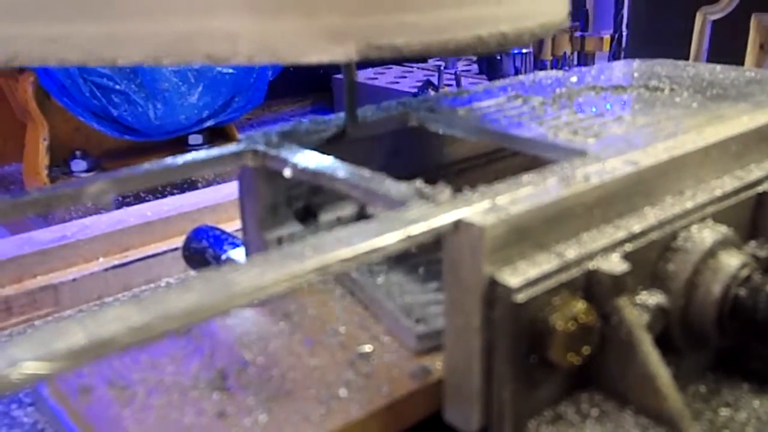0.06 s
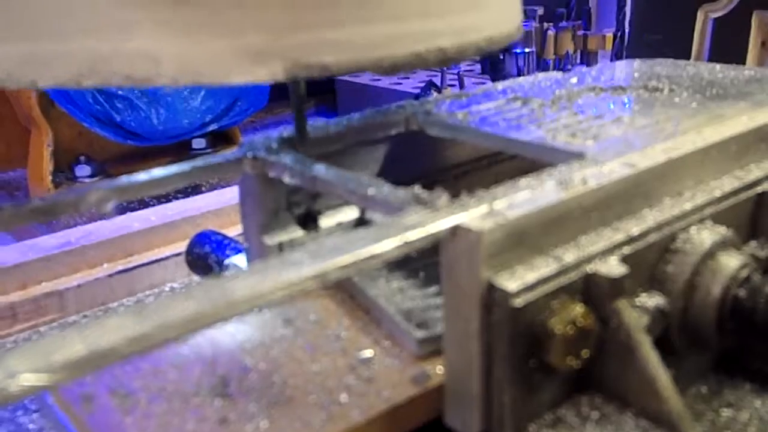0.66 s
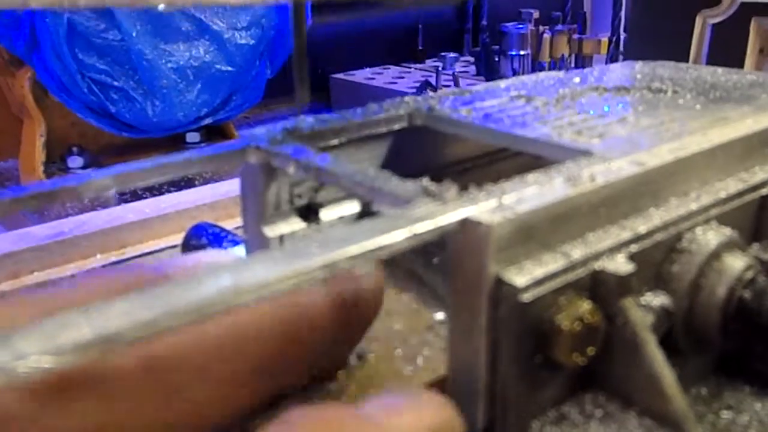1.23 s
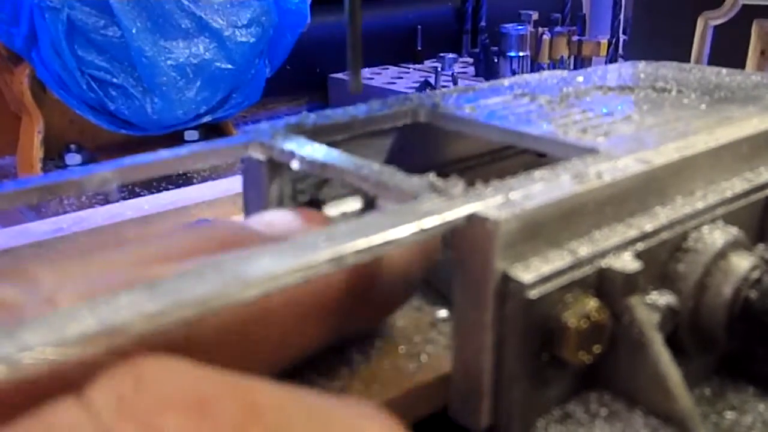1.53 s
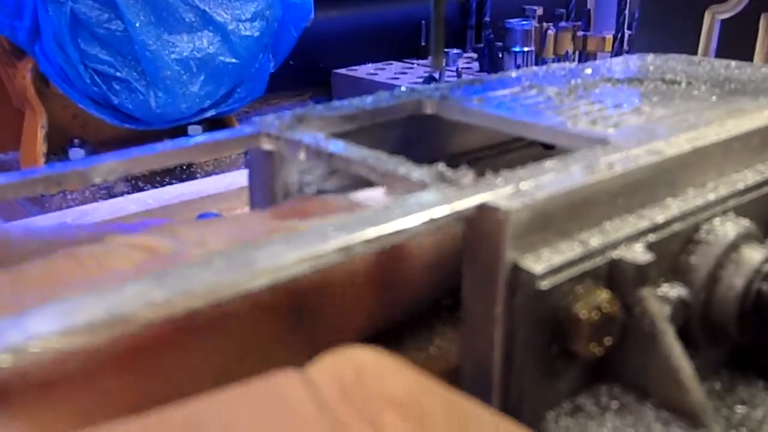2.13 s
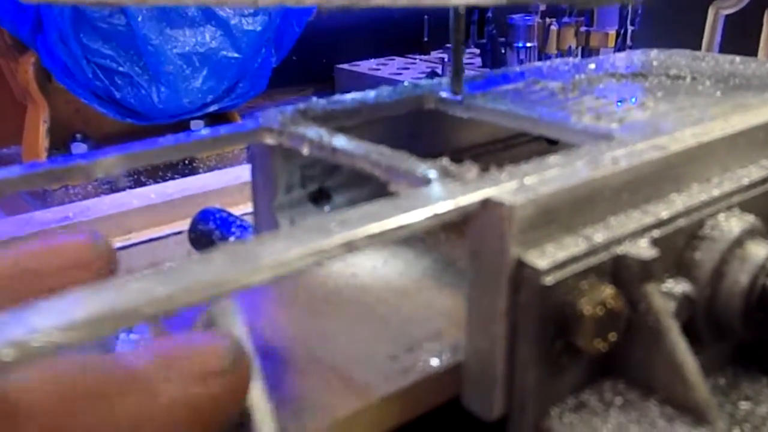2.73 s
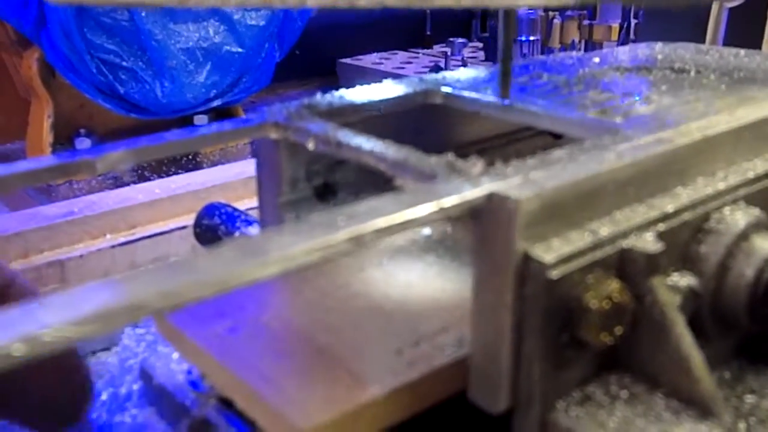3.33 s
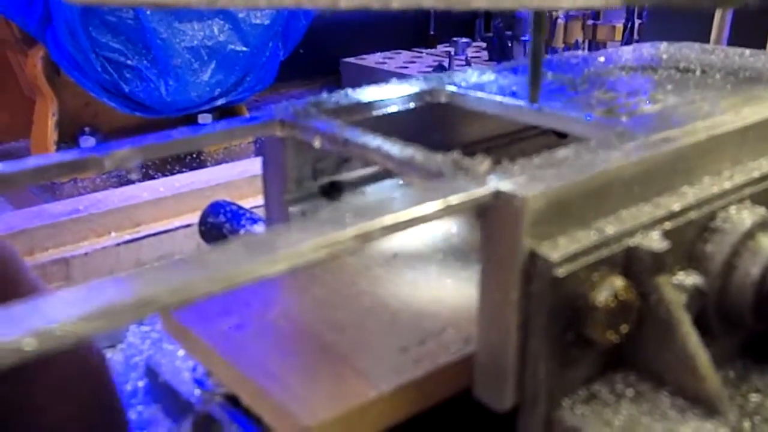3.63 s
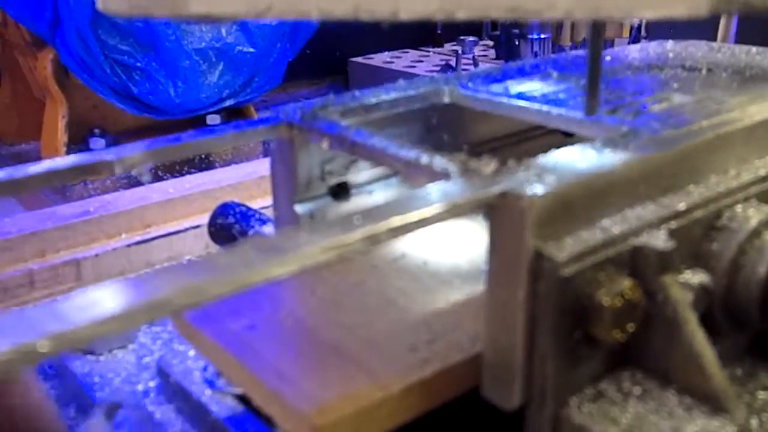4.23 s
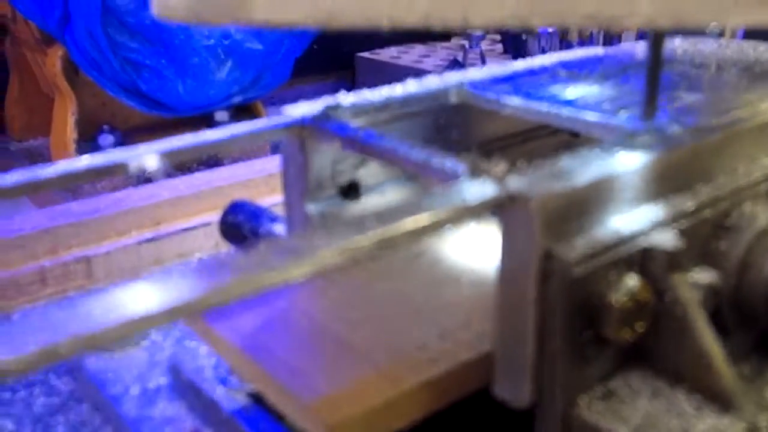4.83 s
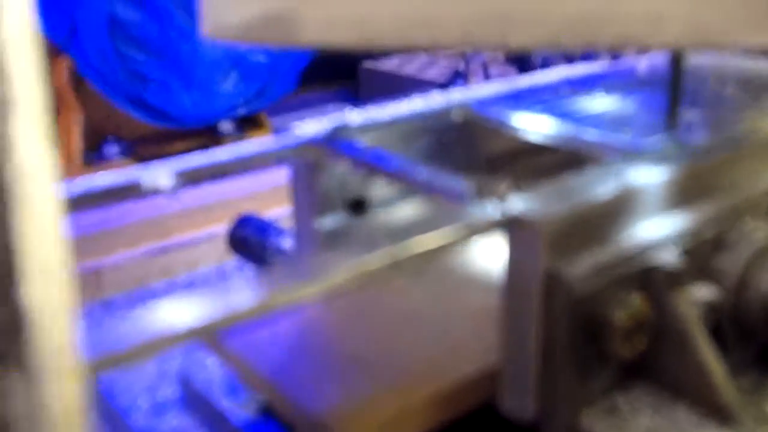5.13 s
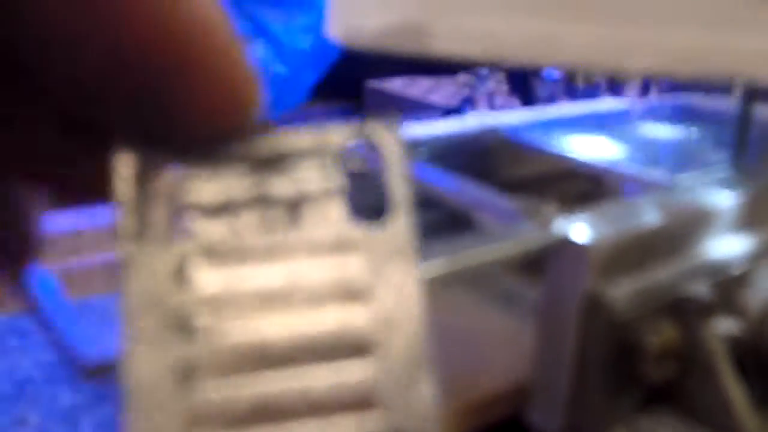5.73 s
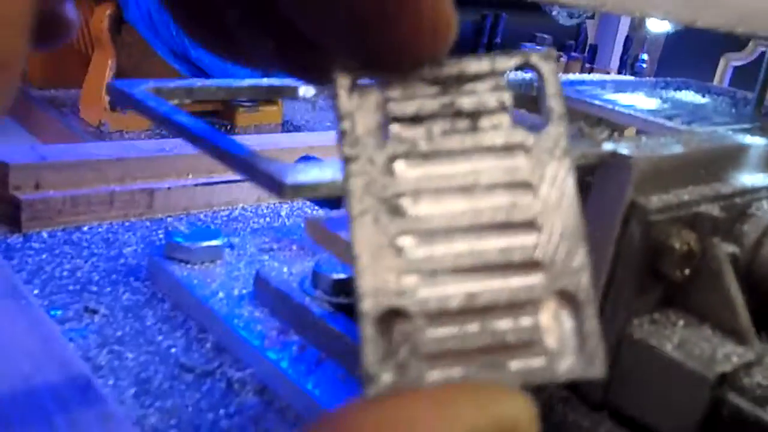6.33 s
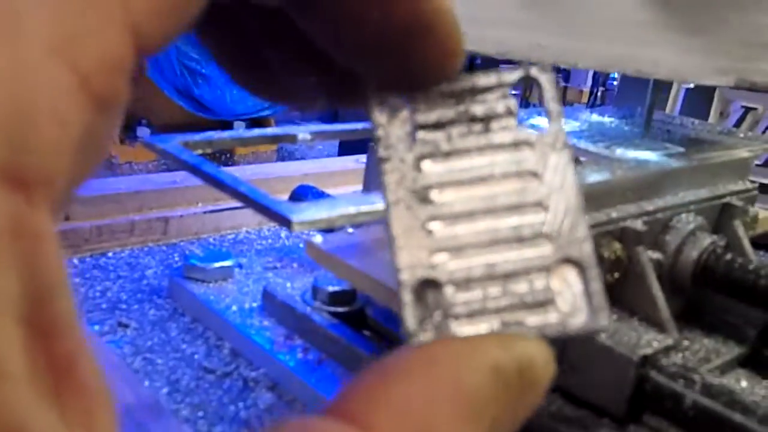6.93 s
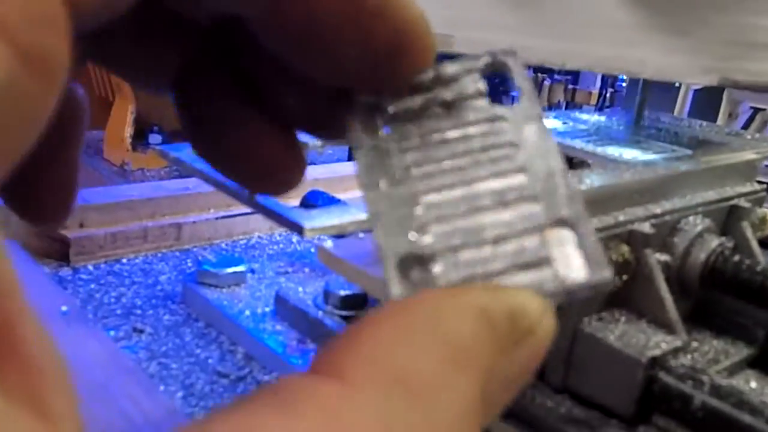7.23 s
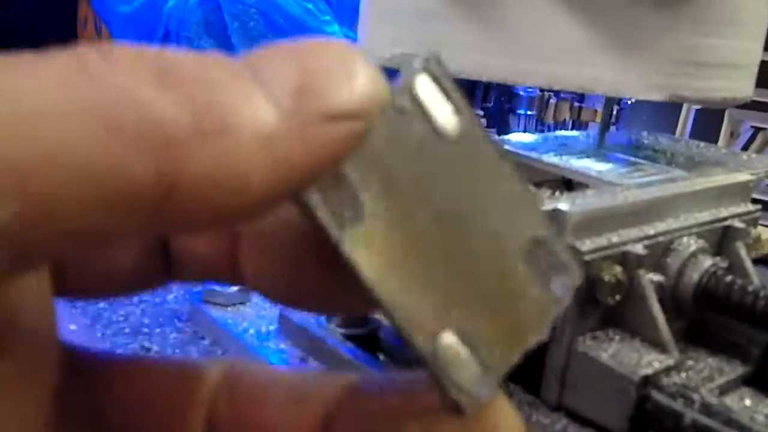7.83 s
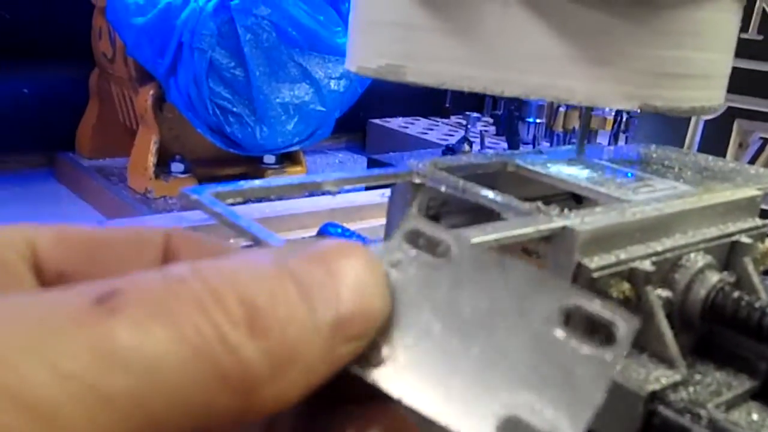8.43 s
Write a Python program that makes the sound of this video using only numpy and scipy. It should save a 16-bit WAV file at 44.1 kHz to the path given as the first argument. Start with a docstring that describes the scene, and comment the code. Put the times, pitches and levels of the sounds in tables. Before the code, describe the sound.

High spindle whine and hissing air, with a cutter biting into aluminium, pausing, then rattling and squealing through the metal.

```python
"""A CNC router mills an aluminium frame close to the microphone, its spindle whining at about 485 turns/s.
The cutter leaves the metal at 0.7 s, the axis motors hum, and it plunges in again at 2.55 s.
From there it vibrates against the work and chatters, first with a rattle, then as a clean squeal.
Around it are the hiss of the cut and the rush of cooling air, with the bed rumbling underneath."""
import sys
import numpy as np
from scipy import signal
from scipy.fft import rfft, irfft
from scipy.io import wavfile
from scipy.ndimage import uniform_filter1d

SR = 44100
rng = np.random.default_rng(int(sys.argv[2]) if len(sys.argv) > 2 else 0)


def master_out(mix):
    """Clip the mix to full scale and print it as 16-bit PCM to the path in sys.argv[1]."""
    frames = np.transpose(np.atleast_2d(mix))
    ceiling = np.clip(frames, -1, 1)
    pcm = np.round(ceiling * 32767).astype(np.int16)
    wavfile.write(sys.argv[1], SR, pcm)


N = 373958
T = np.arange(N) / SR

# carriage position, which changes how the machine radiates: t/s, place along the frame/0-1
CARRIAGE = [(0, 0.12), (4.2, 0.032), (4.65, 0.31), (4.9, 0.37), (6.0, 0.53), (6.7, 0.87), (8.48, 0.93)]
# spindle whine: t/s, level/dB of orders 1, 2, 3
WHINE_DB = [(0, -42, -38, -46), (.8, -39.5, -44.5, -47), (1.2, -38, -49, -56), (1.8, -38, -44, -40),
            (2.6, -39.5, -48, -51), (2.85, -40.5, -42.5, -48), (3.7, -39, -42.5, -47),
            (4.6, -34.5, -37.5, -39), (4.9, -37, -47, -49), (6.2, -36, -43, -48), (6.9, -36, -48.5, -40),
            (7.45, -36, -42.5, -40.5), (8.48, -38, -39.5, -41.5)]
# bearing and motor tones: f/spindle speed
BEARING_RATIOS = [.799, .821, 3.582, 3.641, 4.0, 4.582, 5.0, 10.582, 11.993, 14.6]
# one row a tone: level/dB at the frame's start, middle, end
BEARING_LEVELS = [(-60, -63, -60), (-55.5, -53, -63), (-48, -52, -58), (-51.5, -47, -45), (-55, -53, -39),
                  (-46, -50.5, -39), (-64, -51, -53), (-57, -36, -35), (-56, -47, -50), (-63, -64, -52)]
# force of the edge on the metal in each cut: t/s, level/dB
FIRST_FORCE = [(0, -0.5), (.3, 1), (.72, -1), (.735, -22), (.82, -40)]
SECOND_FORCE = [(2.5, -40), (2.55, -10), (2.59, -5), (2.85, -3.5), (3.4, 2), (4.15, 0), (4.55, -4.5),
                (4.8, -18), (8.48, -9.5)]
# harmonics of the edge's blows: f/spindle speed
BLOW_ORDERS = [5, 6, 7, 8, 9, 10, 11, 13, 15, 17]
# one row a harmonic: level/dB at unit force in the first cut, in the second
BLOW_LEVELS = [(-56, -45.5), (-41, -57), (-47, -45), (-36.5, -36), (-38, -49), (-34.5, -41), (-29.5, -40),
               (-44.5, -51.5), (-50, -63), (-48, -65)]
# bands rung by the tearing chips: modes of cutter and frame, and a further band just above the 5356 Hz one:
# f/Hz, width/Hz, level/dB at # unit force in the first cut, in the second
RINGING_BANDS = [(3680, 35, -32.5, -54), (3780, 24, -50, -31.5), (3826, 25, -47, -27), (5356, 80, -33, -55),
                 (5420, 50, -38, -60), (6260, 160, -56, -53), (7200, 310, -42, -52), (8320, 190, -47.5, -62),
                 (10500, 160, -54.5, -61.5)]
# the edge catches and one mode rings: t/s, half-length/s, f/Hz, level/dB
EDGE_CATCHES = [(.716, 0.005, 5340, -15), (2.577, 0.0049, 3840, -18), (2.62, .005, 3810, -19),
                (2.67, 0.0045, 3780, -26), (3.158, 0.01, 3840, -20), (3.91, .01, 3785, -17),
                (7.48, .06, 6200, -41), (7.847, .05, 6200, -38)]
# chatter pitch, dropping as the cutter sinks in, then creeping up: t/s, f/Hz
CHATTER_PITCH = [(2.52, 3960), (2.58, 3738), (2.69, 3734), (2.74, 3677), (4.2, 3680), (4.8, 3688),
                 (5.6, 3675), (6.42, 3679), (6.75, 3692), (8.48, 3696)]
# chatter strength: t/s, level/dB
CHATTER_LEVEL = [(2.5, -70), (2.57, -23), (3.3, -28), (4.0, -28), (4.62, -33.5), (4.76, -22), (5.7, -23.5),
                 (6.03, -28.5), (6.15, -24.5), (6.43, -24), (6.55, -29), (8.48, -29)]
# chatter sidebands, each at the sum of: multiple of the chatter pitch, multiple of the spindle speed
SIDEBAND_ORDERS = [(1, -2), (1, -1), (1, 1), (1, 2), (1, 5), (1, 7), (2, 0), (2, 1), (2, 2), (3, 4), (3, 6)]
# one row a sideband: relative level/dB at the frame's start, middle, end
SIDEBAND_LEVELS = [(-6, -11, 2.5), (-9, -7, -0.5), (1.5, -0.5, 0), (2.5, -2.5, 4), (-8, -26, -18),
                   (-10, -16, -23), (-22, -11.5, -8), (-21, -16, -27), (-28, -13, -22), (-45, -24, -45),
                   (-38, -20, -43)]
# noise at the cutter: t/s, relative hiss level/dB, spray level/dB
CHIP_LEVELS = [(0, -24, -43), (.3, -33, -43.5), (.75, -29.5, -55), (1.3, -28, -58), (2.57, -28, -57),
               (2.59, -37, -58), (2.85, -33, -57), (3.6, -34.5, -59), (4.0, -31.5, -52), (4.5, -26, -48),
               (5.1, -28, -56), (5.8, -26.5, -61), (6.35, -26, -51.5), (8.48, -26, -51.5)]
# chips scrape in the slot: t/s, half-length/s, lift/dB
CHIP_SCRAPES = [(.714, .008, 1.5), (2.83, 0.053, 3.5), (3.276, 0.016, 4), (3.9, .02, 1.5)]
# rush of cooling air: t/s, relative level/dB
AIR_LEVEL = [(0, -31.5), (.55, -30.5), (1.1, -27), (2.0, -28), (2.57, -27), (2.59, -33), (3.5, -34.5),
             (4.1, -32.5), (4.6, -28.5), (4.8, -31.5), (6.05, -31.5), (6.22, -29), (6.45, -32), (6.75, -30),
             (8.48, -31.5)]
# broad colour of the rush as picked up, with a dull gap around 11-13 kHz from microphone and recorder:
# f/Hz, relative level/dB
PICKED_UP_COLOUR = [(20, -3), (50, -13.5), (120, -10), (200, -10.5), (340, -9), (450, -4.5), (1000, -2),
                    (2000, 3), (4200, 3), (5600, 2), (6300, -9.5), (8500, -15), (10400, -19.5),
                    (11400, -29), (14200, -21)]
# resonances and hollows of housing and bed: f/Hz, width/Hz, gain/dB at the frame's start, middle, end
HOUSING_BANDS = [(768, 130, 6, 4, -1), (1140, 180, -7.5, -5.5, -4.5), (1342, 125, -8.5, -7, -3.5),
                 (1442, 264, 8, 4, 0.5), (1990, 210, 0.5, 2, 5), (2240, 600, -2, -4.5, -2),
                 (2860, 330, 3, -4.5, 1.5), (3344, 400, -7, -0.5, -1.5), (4680, 780, 6, -1.5, 0),
                 (6320, 180, 8, 4.5, 9), (6280, 840, -5, 1, 2.5), (7000, 450, 6.5, 3.5, 4.5),
                 (7600, 1300, 2, 1, 5)]
# a hand reaches in under the frame: t/s, nearness/0-1
HAND_NEARNESS = [(0, 0.3), (.7, 0), (1.2, 0), (1.8, 1), (2.4, 1), (2.75, 0.3), (8.48, 0.03)]
# bands it throws toward the microphone: f/Hz, width/Hz, gain/dB when nearest
HAND_REFLECTIONS = [(300, 270, 2), (1580, 460, 3)]
# axis motors on the move: start t/s, end t/s, f/Hz, level/dB
AXIS_MOVES = [(0.883, 1.13, 98, -47.5), (1.65, 2.15, 110, -48), (2.2, 2.5, 85, -53), (3.4, 4.55, 28, -46.5)]
# the bed's rumble swells as it is moved or handled: t/s, half-length/s, level/dB
BED_SWELLS = [(.7, .25, -58), (1.95, 0.38, -50.5), (4.1, 1, -55.5), (6.05, 0.58, -51.5)]
# resonance of the hiss at even steps along the frame: f/Hz, then width/Hz
HISS_HZ, HISS_WIDTH_HZ = (5400, 5350, 5020, 4800, 5120), (640, 680, 600)


def spindle(turns, place):
    """Imbalance and fan give the low orders of the whine; the bearings add tones between and above."""
    whine = sum(amp(db) * tone(k * turns, waver=0.11) for k, db in enumerate(curve(WHINE_DB), 1))
    bearings = sum(amp(along(place, db)) * tone(k * turns, waver=0.31)
                   for k, db in zip(BEARING_RATIOS, BEARING_LEVELS))
    return whine + bearings


def spindle_speed(free_hz=487.5, leaves_s=0.72, plunges_s=2.55, settle_s=0.12):
    """Turns per second: each cut drags the spindle down, and its inertia smooths the change."""
    first_sag_hz = 1.8 * np.exp(-np.maximum(T - leaves_s, 0) / settle_s)
    second_sag_hz = 2.3 * (1 - np.exp(-np.maximum(T - plunges_s, 0) / settle_s))
    return free_hz - first_sag_hz - second_sag_hz + 0.2217 * drift(4.27)


def cutting(turns, first, second, bite, mains, ripple=0.19):
    """The edge strikes once a turn: rippling harmonics, and tearing chips that ring cutter and frame."""
    blows = sum((first * amp(db1) + second * amp(db2)) * tone(k * turns, waver=0.35)
                for k, (db1, db2) in zip(BLOW_ORDERS, BLOW_LEVELS))
    tearing = bite * rng.standard_normal(N)
    ringing = sum((first * amp(db1) + second * amp(db2)) * ring(tearing, hz, width)
                  for hz, width, db1, db2 in RINGING_BANDS)
    catches = sum(amp(db) * swell(s, half_s) * tone(hz * T, waver=0.14)
                  for s, half_s, hz, db in EDGE_CATCHES)
    return blows * (1 + ripple * mains) + ringing + bite * catches


def chatter(turns, place, force, jitter_hz=3.6, wander_hz=3):
    """The cutter vibrates by itself near its bending mode; its rotation adds sidebands."""
    level_db = curve(CHATTER_LEVEL)[0]
    pitch_hz = curve(CHATTER_PITCH)[0] + jitter_hz * drift(26) + wander_hz * drift(3)
    cycles = np.cumsum(pitch_hz) / SR
    squeal = tone(cycles, waver=0.095)
    sidebands = sum(amp(along(place, db)) * tone(m * cycles + k * turns, waver=0.18)
                    for (m, k), db in zip(SIDEBAND_ORDERS, SIDEBAND_LEVELS))
    # the harder the cut, the weaker the sidebands and the rougher the chatter
    sidebands_db = np.minimum(level_db, -37.5 - 3 * force)
    roughness = 0.082 + 0.22 * force
    grip = (1 + roughness * drift(81)) / np.sqrt(1 + roughness ** 2)
    return grip * (amp(level_db) * squeal + amp(sidebands_db) * sidebands)


def hiss(place, gain_db=-2):
    """Noise at the cutter, through a broad resonance that shifts as the carriage travels."""
    t, f, noise = noise_grid()
    place = np.interp(t, T, place)[:, None]
    detuning = (f - along(place, HISS_HZ)) / along(place, HISS_WIDTH_HZ)
    peak = 1 / (1 + (1.68 * detuning) ** 2) ** 1.2
    peak /= np.linalg.norm(peak, axis=1, keepdims=True)
    return amp(curve(CHIP_LEVELS)[0] + gain_db) * unit(waveform(noise * peak))


def spray(centre_hz=9000, width_hz=6500, patchy_db=2):
    """Fine chips and air fizz above the hiss."""
    _, f, noise = noise_grid()
    band = 1 / (1 + (2 * (f - centre_hz) / width_hz) ** 4)
    fizz = waveform(noise * band * amp(patchy_db * patches(noise.shape)))
    return amp(curve(CHIP_LEVELS)[1]) * unit(fizz)


def cooling_air(place, gain_db=4, patchy_db=0.78):
    """The fan's rush as the microphone picks it up, coloured by housing, bed and the passing hand."""
    t, f, noise = noise_grid()
    place = np.interp(t, T, place)[:, None]
    nearness = curve(HAND_NEARNESS, t)[0][:, None]
    colour_hz, colour_db = np.transpose(PICKED_UP_COLOUR)
    broad_db = np.interp(np.log(f + 1), np.log(colour_hz), colour_db)
    housing_db = sum(along(place, db) * bell(f, hz, width) for hz, width, *db in HOUSING_BANDS)
    hand_db = nearness * sum(db * bell(f, hz, width) for hz, width, db in HAND_REFLECTIONS)
    rush = waveform(noise * amp(broad_db + housing_db + hand_db + patchy_db * patches(noise.shape)))
    return amp(curve(AIR_LEVEL)[0] + gain_db) * unit(rush)


def air_and_chips(place, load, throb_hz=6.69):
    """Air, hiss and spray throb together, deeper under load, and rise when a chip scrapes."""
    throb_db = (0.3 + 0.7 * load) * np.cos(2 * np.pi * throb_hz * T)
    scrape_db = sum(db * swell(s, half_s) for s, half_s, db in CHIP_SCRAPES)
    flutter_db = (0.97 + 0.55 * load) * drift(28)
    spurt_db = (0.55 + 0.55 * load) * drift(25)
    air = amp(flutter_db) * cooling_air(place)
    chips = amp(0.92 * flutter_db + spurt_db) * (hiss(place) + spray())
    return amp(throb_db + scrape_db) * (air + chips)


def axis_motors():
    """The axis motors hum while they move."""
    hum = np.zeros(N)
    for start, end, hz, db in AXIS_MOVES:
        progress = np.clip((T - start) / (end - start), 0, 1)
        arch = np.sqrt(np.sin(np.pi * progress).clip(0))
        hum += amp(db) * arch * tone(hz * T, waver=0.12)
    return hum


def bed_rumble(band_hz=(15, 130), floor_db=-64):
    """The bed rumbles in the background, and swells as it is moved or handled."""
    band = signal.butter(2, band_hz, "band", fs=SR, output="sos")
    rumble = unit(signal.sosfilt(band, rng.standard_normal(N)))
    swells = sum(amp(db) * swell(s, half_s) for s, half_s, db in BED_SWELLS)
    return (amp(floor_db) + swells) * rumble


def amp(db):
    """Decibels to gain."""
    return 10 ** (np.asarray(db) / 20)


def unit(x):
    """Scales to an rms of 1."""
    return x / np.sqrt(np.mean(x ** 2) + 1e-20)


def curve(rows, t=T):
    """Each column of a table, joined by straight lines in time."""
    times, *columns = np.transpose(rows)
    return [np.interp(t, times, column) for column in columns]


def along(place, values):
    """Reads values set at even steps from the start of the frame to its end."""
    return np.interp(place, np.linspace(0, 1, len(values)), values)


def swell(s, half_s):
    """A bell of height 1 in time, down to 1/e at half_s either side."""
    return np.exp(-((T - s) / half_s) ** 2)


def bell(f, centre, width):
    """A bell of height 1 along the frequency axis."""
    return 2 ** -((2 * (f - centre) / width) ** 2)


def drift(hz, points=2 ** 14, rate_hz=1500):
    """Slow random motion of unit rms, up to about hz."""
    f = np.fft.rfftfreq(points, 1 / rate_hz)
    slow = irfft(rfft(rng.standard_normal(points)) / (1 + (f / hz) ** 4))
    return unit(np.interp(T * rate_hz, np.arange(points), slow))


def tone(cycles, waver):
    """A tone of unit rms whose level and phase waver as the room's paths to the microphone shift."""
    angle = 2 * np.pi * cycles
    carrier = (1 + waver * drift(13.4)) * np.cos(angle + 2 * np.pi * rng.random())
    return unit(carrier + waver * drift(10.6) * np.sin(angle))


def ring(x, hz, width):
    """A steep resonance, scaled to unit rms."""
    b, a = signal.iirpeak(hz, hz / (1.53 * width), SR)
    return unit(signal.lfilter(b, a, signal.lfilter(b, a, x)))


def noise_grid():
    """Times, bin frequencies and random short-time spectra."""
    t = np.arange(N // 256 + 5) * 256 / SR
    f = np.fft.rfftfreq(1024, 1 / SR)
    shape = len(t), len(f)
    return t, f, rng.standard_normal(shape) + 1j * rng.standard_normal(shape)


def patches(shape, steps=6, bins=14):
    """Random patches of unit rms in time and frequency."""
    field = uniform_filter1d(rng.standard_normal(shape), steps, axis=0)
    return unit(uniform_filter1d(field, bins, axis=1))


def waveform(spectra):
    """Joins short-time spectra into a waveform."""
    return signal.istft(spectra.T, nperseg=1024, noverlap=768)[1][:N]


def scene():
    """The whole machine at one close microphone."""
    turns = np.cumsum(spindle_speed()) / SR
    place = curve(CARRIAGE)[0]
    first, second = amp(curve(FIRST_FORCE)[0]), amp(curve(SECOND_FORCE)[0])
    load = np.clip(first + second, 0, 1)
    # under load the noise pulses once a turn, and with the mains ripple in the motor's torque
    mains = np.cos(2 * np.pi * 100 * T)
    bite = unit(1 + load * (0.26 * np.cos(2 * np.pi * turns) + 0.094 * mains))
    noise = bite * air_and_chips(place, load)
    whine = spindle(turns, place)
    cut = cutting(turns, first, second, bite, mains) + chatter(turns, place, second)
    return (whine + cut + noise + axis_motors() + bed_rumble())[None]


def record(dry):
    """The recorder passes the microphone's signal up to 14250 Hz."""
    lowpass = signal.firwin(511, 14250, window=("kaiser", 9), fs=SR)
    return signal.oaconvolve(dry, lowpass[None], "same")


dry = scene()
out = record(dry)
master_out(out)
```